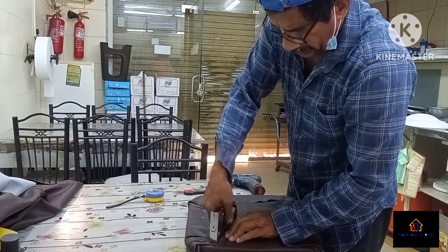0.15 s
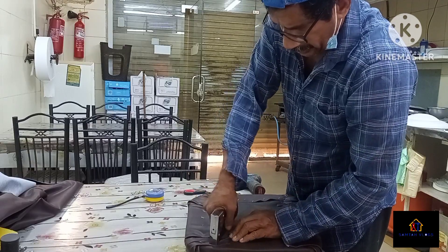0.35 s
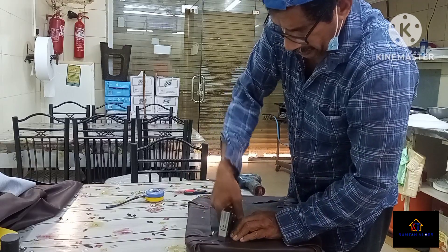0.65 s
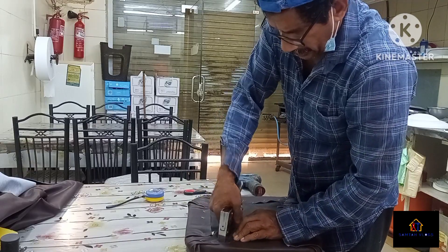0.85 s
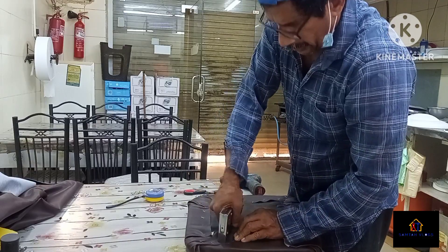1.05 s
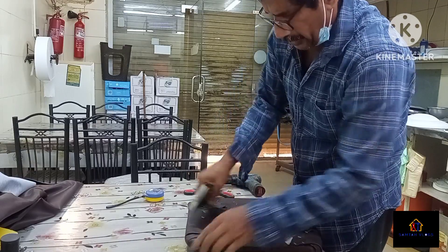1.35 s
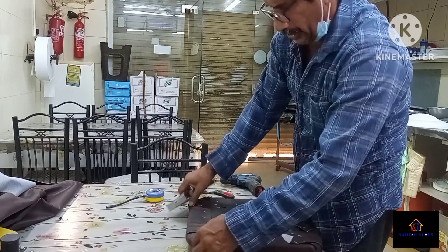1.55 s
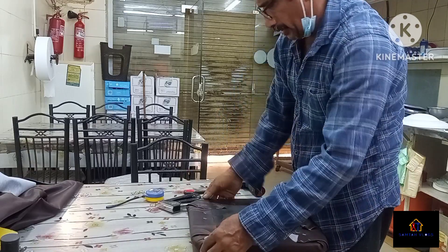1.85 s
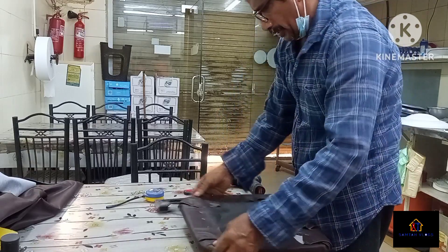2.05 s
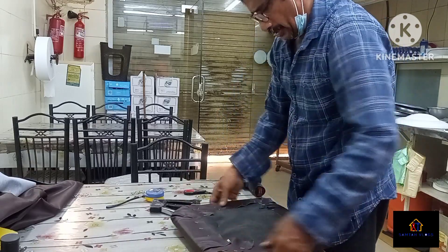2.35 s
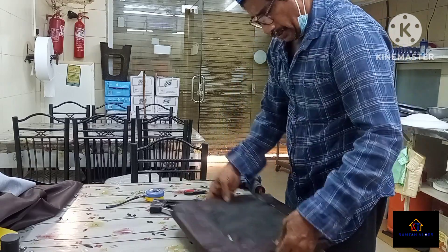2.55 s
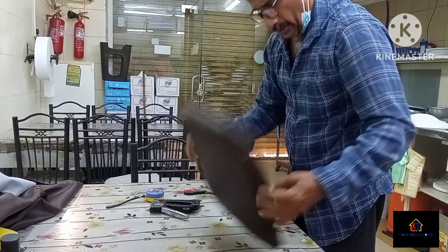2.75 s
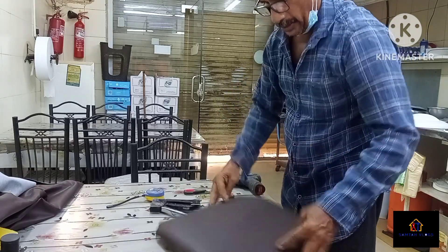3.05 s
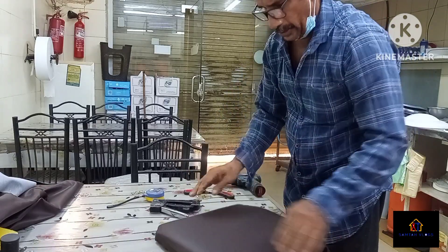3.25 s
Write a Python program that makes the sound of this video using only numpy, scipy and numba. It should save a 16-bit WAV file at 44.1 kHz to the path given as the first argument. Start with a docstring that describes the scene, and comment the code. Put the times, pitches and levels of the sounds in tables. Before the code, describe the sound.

A hand staple gun cracks twice into a padded board in a hard, echoing room, then clatters onto the table; the seat is shifted, flipped and dropped with thuds. Close microphone, steady fan hum.

```python
"""A hard-walled workshop: a hand staple gun snaps into a padded seat board on a table and its lever ticks.
Then the gun is set down and the seat is shifted, flipped and dropped, while a fan rumbles, hisses and hums.
Cracks, ticks and clatter are decaying noise, thuds and gun body are ringing modes, sliding cloth is grainy
noise. A noise tail gives the echo; a limiter holds down each bang."""
import sys
import numpy as np
from scipy import signal
from scipy.fft import rfft, irfft
from scipy.io import wavfile
from scipy.ndimage import uniform_filter1d
from numba import njit

SR = 44100
rng = np.random.default_rng(int(sys.argv[2]) if len(sys.argv) > 2 else 0)


def transcribe(signal):
    """Save signal, clipped to [-1, 1], as a 16-bit WAV file at the path in sys.argv[1]."""
    frames = np.atleast_2d(signal).T
    limited = np.clip(frames, -1, 1)
    pcm = np.round(limited * 32767).astype(np.int16)
    wavfile.write(sys.argv[1], SR, pcm)


def ratio_of_db(decibels):
    """Turn decibels (scalar or array-like) into linear amplitude factors; 0 dB maps to 1."""
    return 10 ** (np.asarray(decibels, float) / 20)


N = 149940  # length in samples
LEAD = 13230  # samples of sound before the start

# staple shots, the first before the start so that only its echo is heard:
# (time [s], level [dB], ring of the gun's body [dB])
SHOT_EVENTS = [(-.2, 3, 1), (.4888, 1.5, -5), (1.193, 1, -2)]
# relative spectrum of the gun's cracks and ticks: (frequency [Hz], level per Hz [dB])
CRACK_SPECTRUM = [(290, 5), (500, -12.5), (603, 0.5), (727, -4.5), (957, -7), (999, -4.5), (1220, -5.5),
                  (1540, 1), (1910, 1.5), (3260, -3.5), (5890, -6), (9750, -10.5), (13400, -24),
                  (15700, -10.5)]
# relative spectrum of clatter and rubbing on the table: (frequency [Hz], level per Hz [dB])
CLATTER_SPECTRUM = [(290, -21), (500, -1), (771, -2), (840, -5), (957, -6), (1390, -11.5), (1970, -10.5),
                    (2440, -14), (8090, -31), (9210, -26.5), (12500, -48), (15700, -32)]


def evened(x):
    """Scales to rms 1."""
    return x / np.sqrt(np.mean(x ** 2) + 1e-20)


def read(points, hz):
    """Reads a spectrum table on a log frequency axis."""
    f, value = np.transpose(points)
    return np.interp(np.log(hz + 1), np.log(f + 1), value)


def add(mix, s, sound):
    """Mixes a sound in at time s."""
    part = mix[:, max(round(s * SR) + LEAD, 0):][:, :sound.shape[1]]
    part += sound[:, :part.shape[1]]


def coloured(gain_at, size):
    """Noise of rms 1 with the given gain by frequency."""
    hz = np.fft.rfftfreq(size, 1 / SR)
    return evened(irfft(rfft(rng.standard_normal(size)) * gain_at(hz), size))


def bell(hz, centre_hz, octaves):
    """Bell-shaped gain around a centre."""
    return np.exp(-.5 * (np.log2((hz + 1) / centre_hz) / octaves) ** 2)


def ring(modes, gain):
    """Struck modes dying away as decaying sines."""
    hz, db, t60 = np.transpose(modes)[:, :, None]
    t = np.arange(8192) / SR
    return (gain * ratio_of_db(db - 60 * t / t60) * np.sin(2 * np.pi * hz * t)).sum(0)


def burst(gain_at, db, t60, echo_db):
    """A crack of coloured noise that dies at once; second row: a click of that colour that feeds the room."""
    t = np.arange(4096) / SR
    envelope = ratio_of_db(db - 60 * t / t60) * np.minimum(t / 0.00012, 1)
    crack = envelope * coloured(gain_at, size=4096)
    click = np.roll(irfft(gain_at(np.fft.rfftfreq(4096, 1 / SR))), shift=128)
    click = click * (np.arange(4096) < 256)
    # the click's energy follows that of the decaying crack
    decay_norm = np.sqrt(t60 * SR / np.log(1e6))
    return np.array([crack, click * ratio_of_db(db + echo_db) * decay_norm / np.linalg.norm(click)])


def thud(db, centre_hz):
    """The table modes near the centre ring out; the room gets a wider, duller click."""
    # modes of the table top and seat board: (frequency [Hz], level [dB], t60 [s])
    board_modes = [(72, 0, .15), (92, -6, 0.13), (115.7, -26.5, 0.074), (178, -7, 0.033), (221.4, 9, 0.12),
                   (250, 2, 0.23), (300, 0.5, 0.059), (387, 0, 0.077), (463, -15, 0.02),
                   (585, -23.5, 0.017), (750, -63, 0.052)]
    octaves, echo_octaves = 0.28, 0.77
    rise_s, echo_db = 0.0019, -3
    gain = bell(np.transpose(board_modes)[0][:, None], centre_hz, octaves)
    onset = np.minimum(np.arange(8192) / SR / rise_s, 1)
    direct = ring(board_modes, gain / gain.sum()) * onset
    click = np.roll(irfft(bell(np.fft.rfftfreq(8192, 1 / SR), centre_hz, echo_octaves)), shift=256)
    click = click * (np.arange(8192) < 512) / np.linalg.norm(click)
    return ratio_of_db(db) * np.array([direct, ratio_of_db(echo_db) * np.linalg.norm(direct) * click])


def fan():
    """Steady fan: rumble and hiss of shaped noise, hum of narrow noise bands that waver like fuzzy tones."""
    # relative rumble spectrum: (frequency [Hz], level per Hz [dB])
    rumble_spectrum = [(25, -45), (60, -23), (95, -12), (150, -14.5), (200, -5.5), (250, 3), (320, -11.5),
                       (450, -8), (620, -18.5), (800, -14.5), (1000, -20.5), (1300, -55)]
    # relative hiss spectrum: (frequency [Hz], level per Hz [dB])
    hiss_spectrum = [(590, -65), (1000, -10.5), (1220, -3.5), (1320, -3), (1640, -1), (2890, -9),
                     (3760, -10.5), (4790, -16.5), (5130, -24), (6470, -12), (8050, -27), (9030, -13),
                     (12600, -39), (15700, -27)]
    # hum lines: (frequency [Hz], width [Hz], level [dB])
    hum_lines = [(127.4, 7.7, -45.5), (238.4, 15.5, -37), (678, 11, -57), (1654, 30, -60.5),
                 (3810, 22, -66.5)]
    rumble_db, hiss_db = -39, -49.5
    out = ratio_of_db(rumble_db) * coloured(lambda hz: ratio_of_db(read(rumble_spectrum, hz)), size=N + LEAD)
    out += ratio_of_db(hiss_db) * coloured(lambda hz: ratio_of_db(read(hiss_spectrum, hz)), size=N + LEAD)
    for line_hz, width_hz, db in hum_lines:
        out += ratio_of_db(db) * coloured(lambda hz: 1 / (1 + (2 * (hz - line_hz) / width_hz) ** 2), size=N + LEAD)
    return out


def shots():
    """Each shot is three quick noise cracks and a thud in the board."""
    # spring release, driver on staple, rebound: (delay [s], level [dB], t60 [s])
    crack_parts = [(0, -3, 0.037), (.0024, 13, 0.017), (.006, 2, .025)]
    low_hz, echo_db = 350, 5.5  # cracks thin out below low_hz
    thud_db, thud_hz, thud_delay_s, thud_echo_db = -1, 259, .006, -7

    def colour(hz):
        return ratio_of_db(read(CRACK_SPECTRUM, hz)) * np.minimum(hz / low_hz, 1) ** 2

    out = np.zeros((2, N + LEAD))
    for s, db, _ in SHOT_EVENTS:
        for delay, part_db, t60 in crack_parts:
            crack = burst(colour, db + part_db, t60, echo_db)
            # the room smears the three into one echo, fed by the first
            add(out, s + delay, crack * [[1], [delay == 0]])
        board = thud(db + thud_db, thud_hz) * ratio_of_db(np.array([[0], [thud_echo_db]]))
        add(out, s + thud_delay_s, board)
    return out


def gun_body():
    """The gun's steel body rings in its modes at each shot and as it touches the table."""
    # modes of the steel body: (frequency [Hz], level [dB], t60 [s])
    body_modes = [(1650, -16, .012), (2150, -15, .012), (3030, -21, .012), (3750, -21, .012),
                  (4690, -20, .015), (5670, -24, .01), (6610, -23, .01), (9220, -28, .008)]
    # ringing as the gun touches the table: (time [s], level [dB])
    touches = [(1.787, -22), (1.797, -9.5), (2.3, -30)]
    echo_db = 11
    out = np.zeros((2, N + LEAD))
    for s, db in [row[::2] for row in SHOT_EVENTS] + touches:
        signs = rng.choice([-1., 1.], (len(body_modes), 1))
        add(out, s, ratio_of_db(db + np.array([[0], [echo_db]])) * ring(body_modes, signs))
    return out


def room(x):
    """Dense echoes that build up quickly, each band of the noise tail dying at its own speed."""
    # decay by band: (frequency [Hz], t60 [s])
    decay_times = [(100, 0.77), (300, 0.57), (1000, 0.58), (3000, 0.56), (7000, 0.59), (12000, 0.46)]
    build_s = 0.011
    hz, t, z = signal.stft(rng.standard_normal(SR), SR, nperseg=256)
    tail = signal.istft(z * ratio_of_db(-60 * t / read(decay_times, hz)[:, None]), SR, nperseg=256)[1]
    tail = tail * (1 - np.exp(-(np.arange(len(tail)) / SR / build_s) ** 2))
    return signal.fftconvolve(x, tail / np.linalg.norm(tail))[:len(x)]


def knocks():
    """Gun and seat knock on the table: a modal thud just behind a burst of clatter noise."""
    # knocks: (time [s], thud level [dB], thud centre [Hz], clatter level [dB])
    knock_events = [(0.0362, -3.5, 372, -54), (0.759, -17.5, 382, -47), (1.79, -13, 110, -30),
                    (1.787, -12.5, 216, -17), (1.797, -2.5, 350, -7.5), (1.804, -3.5, 194, -30),
                    (2.031, -23, 300, -33), (2.286, -22, 300, -36), (2.291, -16.5, 350, -33),
                    (2.337, -12, 300, -42), (2.357, -11, 450, -20), (2.345, -12.5, 107, -31),
                    (2.37, -8, 500, -28), (2.403, -17, 250, -30.5), (3.2044, -1, 210, -16),
                    (3.221, -17, 100, -11.5), (3.228, -1, 193, -18), (3.253, -7, 300, -21)]
    thud_lag_s, clatter_t60_s, clatter_echo_db = 0.001736, 0.07, -0.5
    out = np.zeros((2, N + LEAD))
    for s, thud_db, centre_hz, clatter_db in knock_events:
        add(out, s + thud_lag_s, thud(thud_db, centre_hz))
        clatter = burst(lambda hz: ratio_of_db(read(CLATTER_SPECTRUM, hz)), clatter_db, clatter_t60_s, clatter_echo_db)
        add(out, s, clatter)
    return out


def ticks():
    """Small metal ticks of the gun and its lever: short noise bursts, each around its own pitch."""
    # ticks: (time [s], level [dB], centre [Hz])
    tick_events = [(0.324, -29, 6500), (0.483, -42, 6800), (.963, -38, 6900), (1.184, -39, 7100),
                   (1.755, -36, 5970), (1.773, -27.5, 2500), (2.34, -37, 5000), (2.548, -48, 12000),
                   (3.131, -49, 5000)]
    t60_s, octaves, echo_db = 0.039, 1.34, -6
    out = np.zeros((2, N + LEAD))
    for s, db, centre_hz in tick_events:
        tick = burst(lambda hz: bell(hz, centre_hz, octaves) * ratio_of_db(read(CRACK_SPECTRUM, hz)),
                     db, t60_s, echo_db)
        add(out, s, tick)
    return out


def slide():
    """Seat cloth rubs on the table: noise roughened by random grains; it feeds no echo."""
    # loudness of the rub: (time [s], level [dB])
    rub_levels = [(2.2, -84), (2.28, -49), (2.33, -43), (2.4, -38), (2.55, -51), (2.7, -67), (3.2, -77),
                  (3.23, -26), (3.3, -22.5), (3.4, -27.5)]
    grains_per_s, grain_spread_db, grain_decay_s = 390, 3, 0.0012
    grain_share = 0.44  # the rest is smooth
    sizes = ratio_of_db(grain_spread_db * np.minimum(rng.exponential(1, N), 4))
    grains = (rng.random(N) < grains_per_s / SR) * sizes
    grains = evened(signal.lfilter([1], [1, -np.exp(-1 / (grain_decay_s * SR))], grains))
    rub = coloured(lambda hz: ratio_of_db(read(CLATTER_SPECTRUM, hz)), size=N)
    rub = rub * (1 - grain_share + grain_share * grains)
    t, db = np.transpose(rub_levels)
    level = ratio_of_db(np.interp(np.arange(N) / SR, t, db, -120, -120))
    out = np.zeros((2, N + LEAD))
    add(out, 0, level * rub[None] * [[1], [0]])
    return out


def scene():
    """Gun and table sounds, their echo and the fan."""
    direct, sent = shots() + gun_body() + knocks() + ticks() + slide()  # rows: direct, sent to the room
    return (direct + room(sent) + fan())[None, LEAD:]


@njit
def follow(over_db, clamp_rate, release_rate):
    """Limiter gain follower: quick to clamp, slow to let go."""
    out, held = np.zeros(len(over_db)), 0.
    for i in range(len(over_db)):
        held += (clamp_rate if over_db[i] > held else release_rate) * (over_db[i] - held)
        out[i] = held
    return out


def top_cut(x):
    """Nothing passes above the cut-off."""
    return signal.sosfilt(signal.butter(12, 16680, fs=SR, output="sos"), x)


def record(dry):
    """The microphone's band; a look-ahead limiter clamps each bang and lets the echo swell back; soft clip."""
    low_cut_hz, high_cut_hz = 58, 15620
    limit_db, ratio = -8.5, 14
    attack_s, release_s, ahead_s = 0.00016, 0.048, 0.0015
    ceiling = .95  # full scale is 1
    x = signal.sosfilt(signal.butter(6, low_cut_hz, "high", fs=SR, output="sos"), dry)
    level_db = 10 * np.log10(abs(uniform_filter1d(x[0] ** 2, size=88)) + 1e-12)  # power over 2 ms
    over_db = np.maximum(level_db - limit_db, 0) * (1 - 1 / ratio)
    cut_db = follow(over_db, 1 / (attack_s * SR), 1 / (release_s * SR))
    t = np.arange(N) / SR
    x = x / ratio_of_db(np.interp(t + ahead_s, t, cut_db))
    clipped = ceiling * np.tanh(x / ceiling)
    mix = signal.oaconvolve(clipped, signal.firwin(255, high_cut_hz, fs=SR)[None], "same")
    return top_cut(mix)


dry = scene()
out = record(dry)
transcribe(out)
```